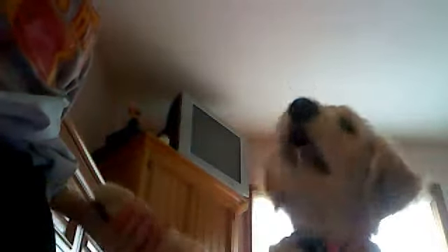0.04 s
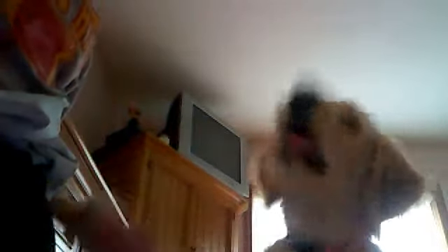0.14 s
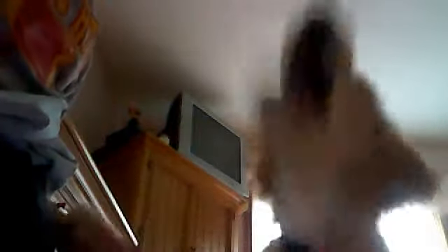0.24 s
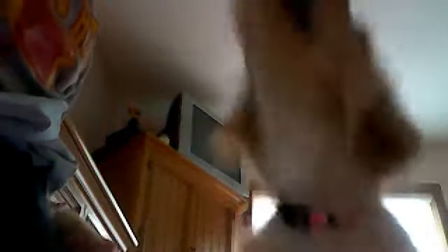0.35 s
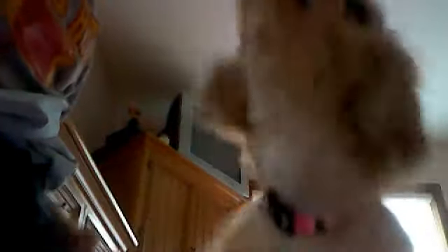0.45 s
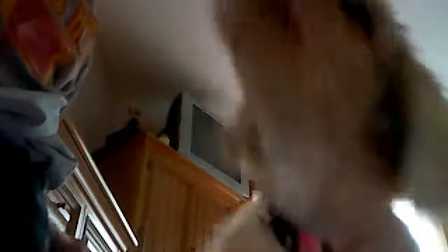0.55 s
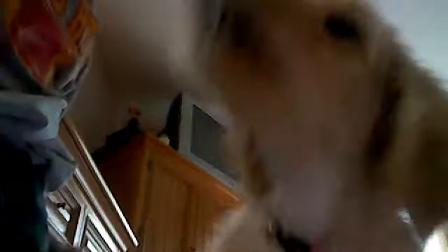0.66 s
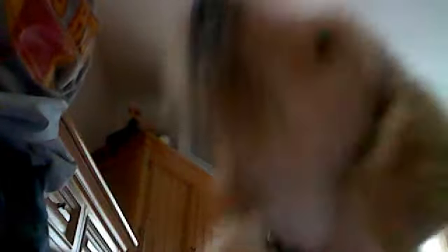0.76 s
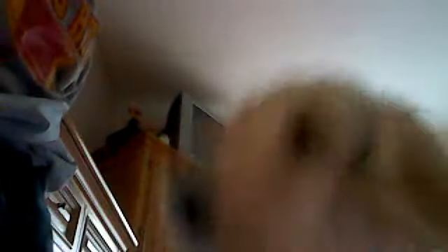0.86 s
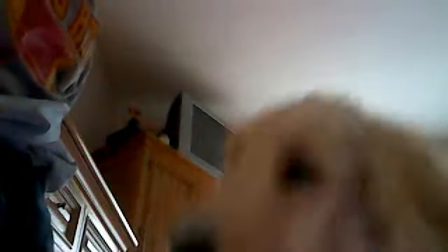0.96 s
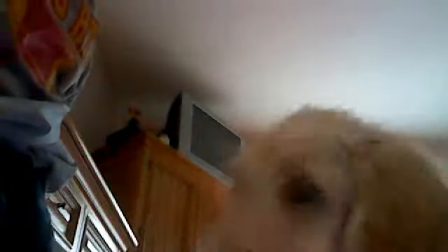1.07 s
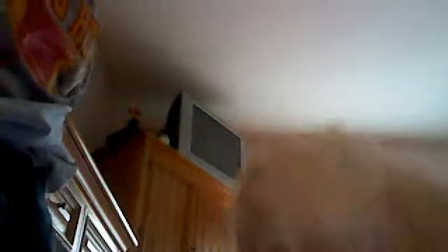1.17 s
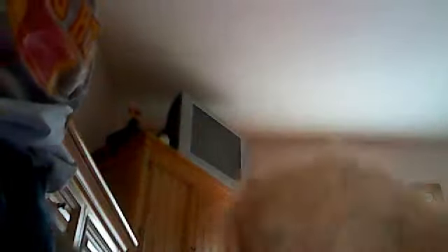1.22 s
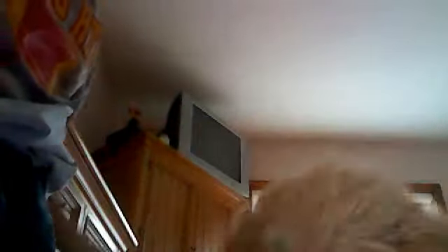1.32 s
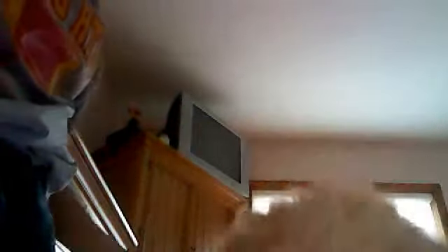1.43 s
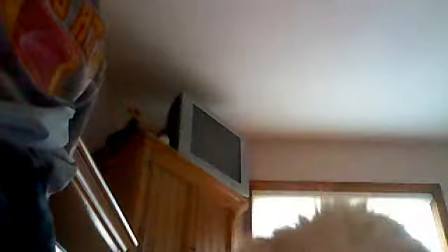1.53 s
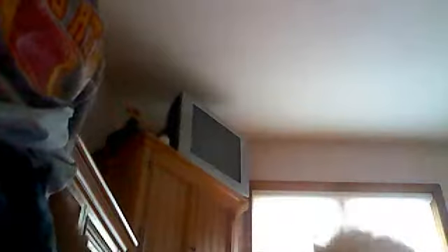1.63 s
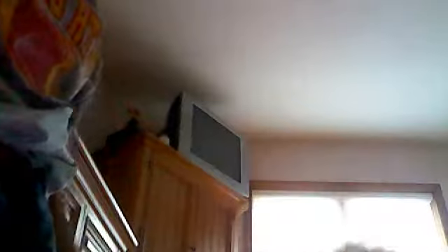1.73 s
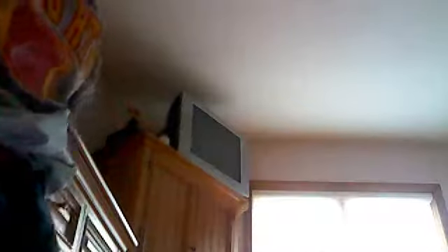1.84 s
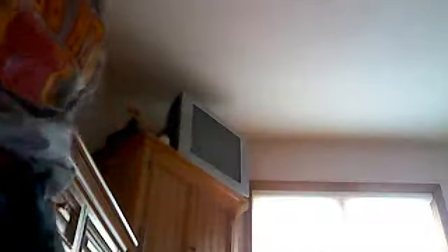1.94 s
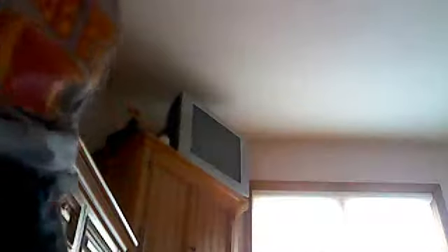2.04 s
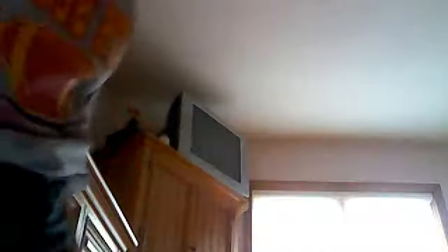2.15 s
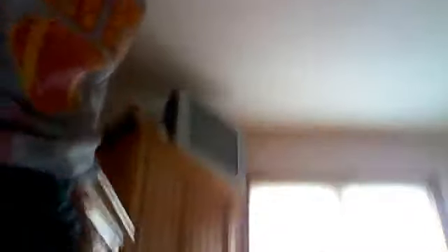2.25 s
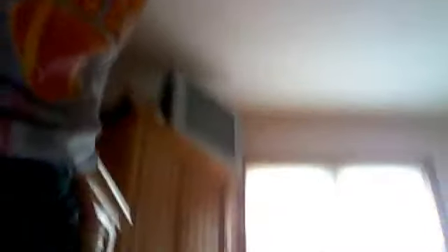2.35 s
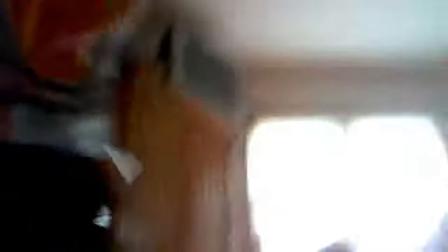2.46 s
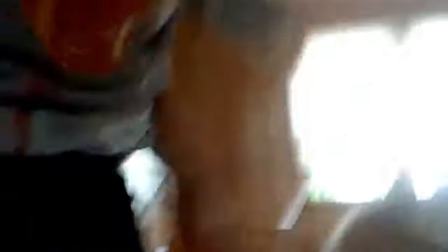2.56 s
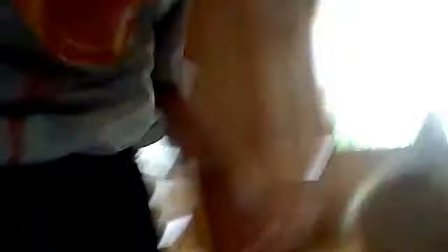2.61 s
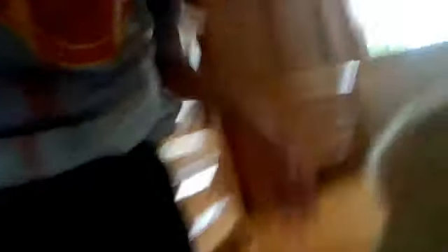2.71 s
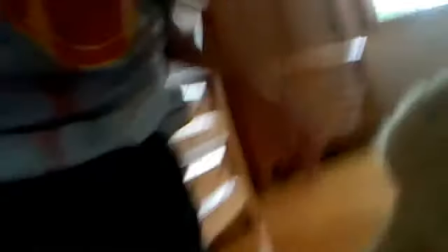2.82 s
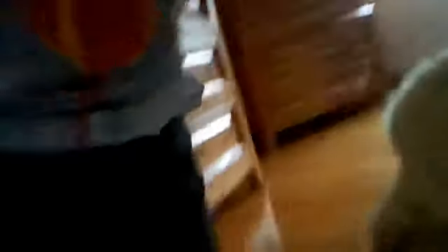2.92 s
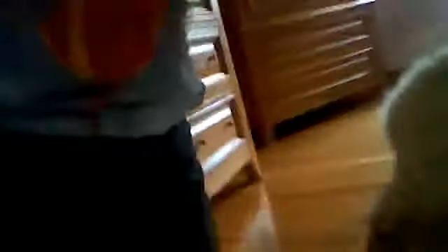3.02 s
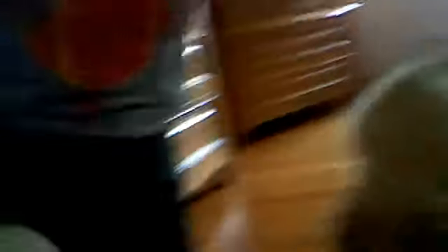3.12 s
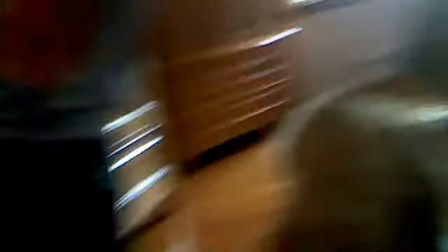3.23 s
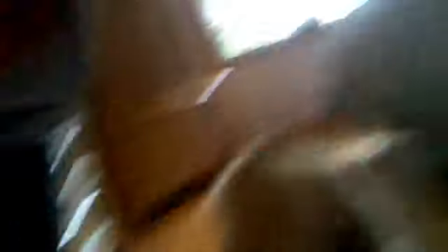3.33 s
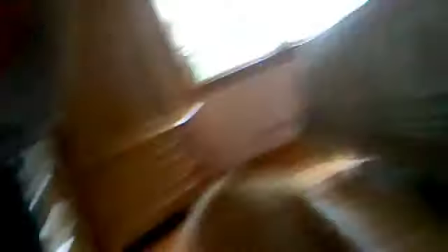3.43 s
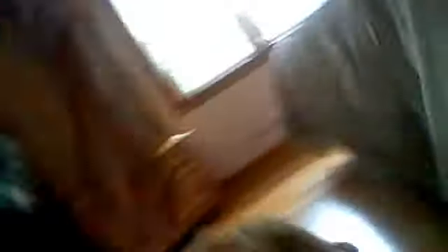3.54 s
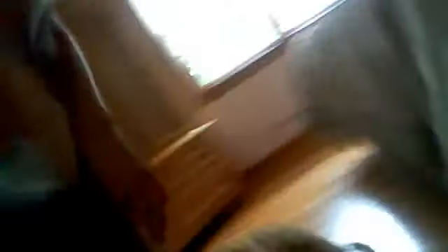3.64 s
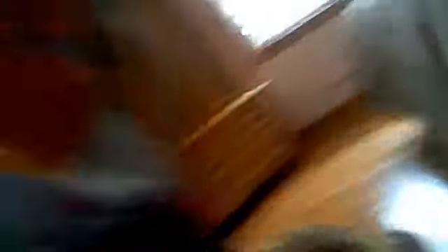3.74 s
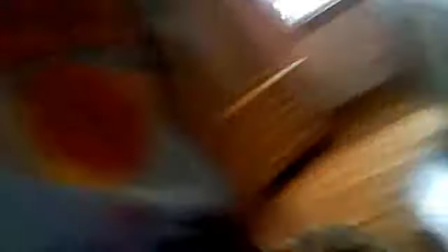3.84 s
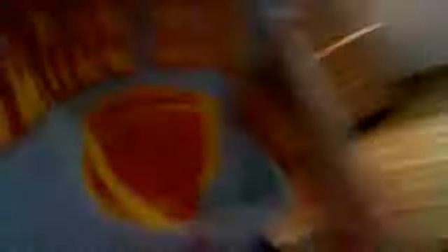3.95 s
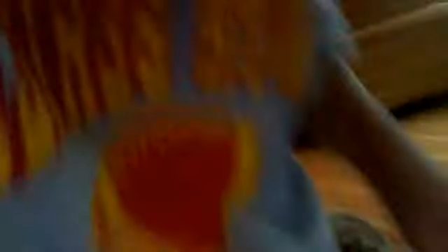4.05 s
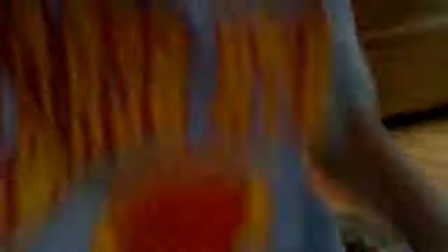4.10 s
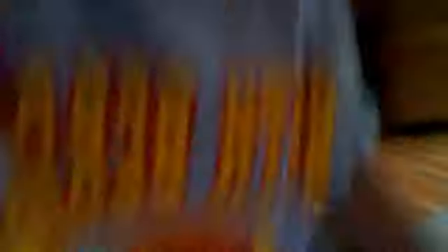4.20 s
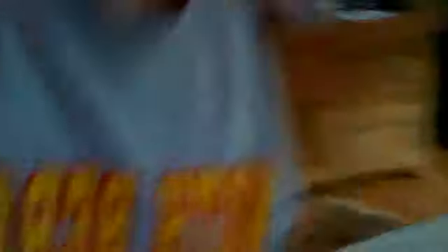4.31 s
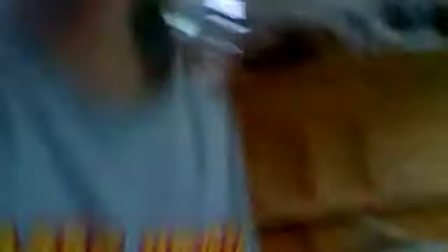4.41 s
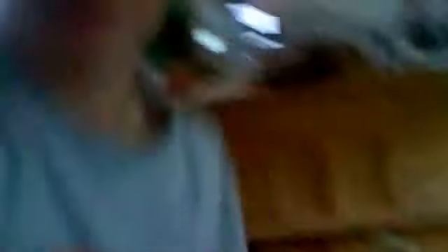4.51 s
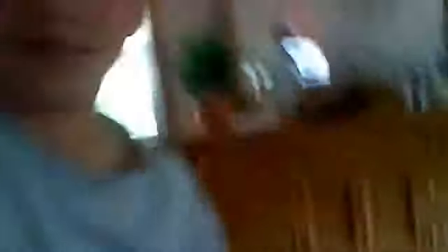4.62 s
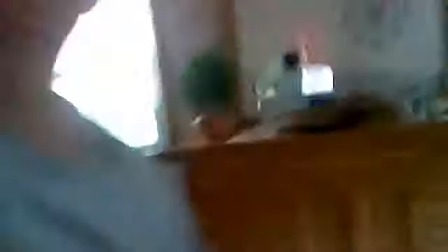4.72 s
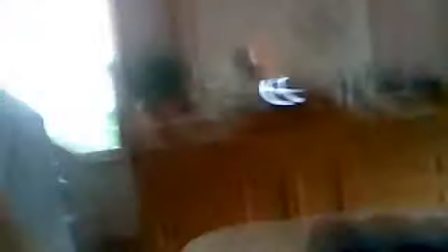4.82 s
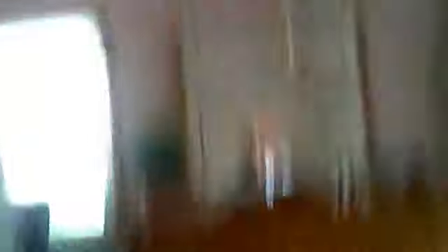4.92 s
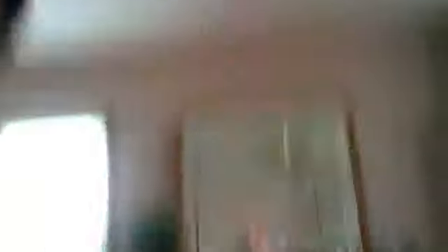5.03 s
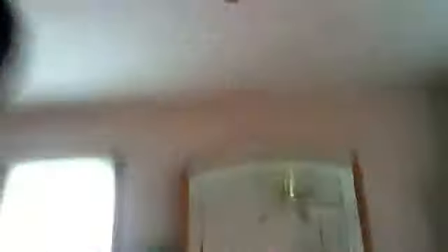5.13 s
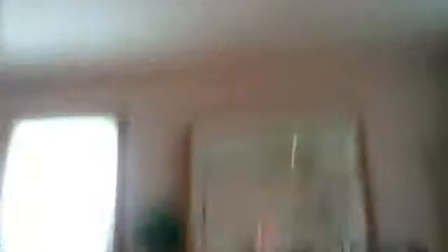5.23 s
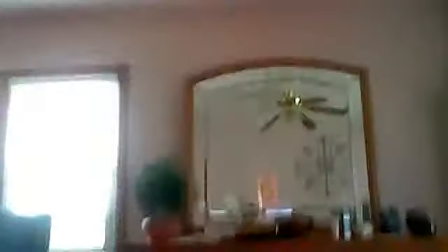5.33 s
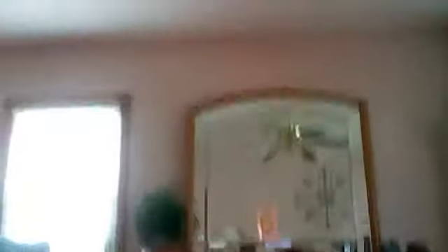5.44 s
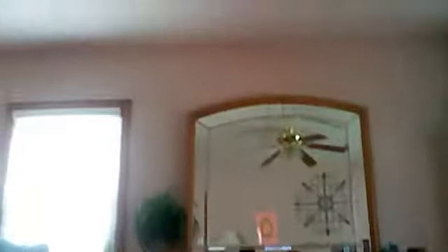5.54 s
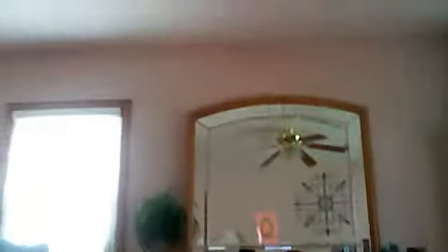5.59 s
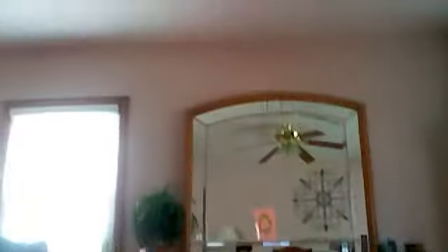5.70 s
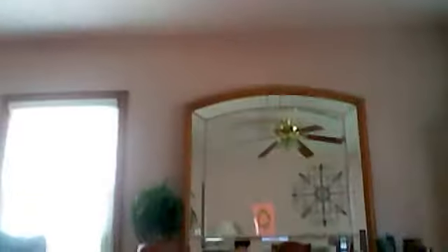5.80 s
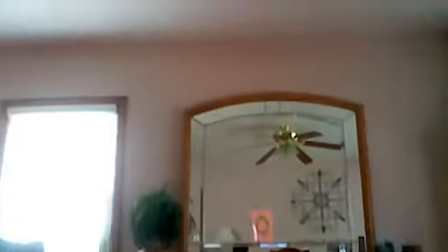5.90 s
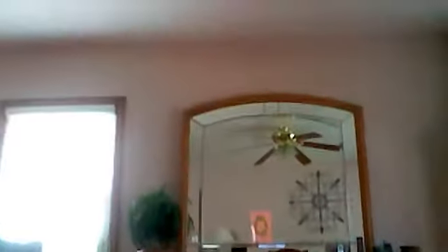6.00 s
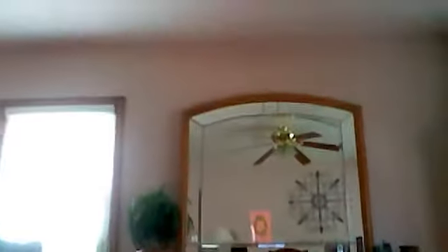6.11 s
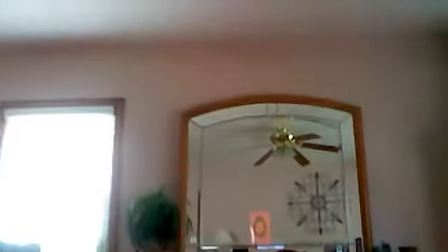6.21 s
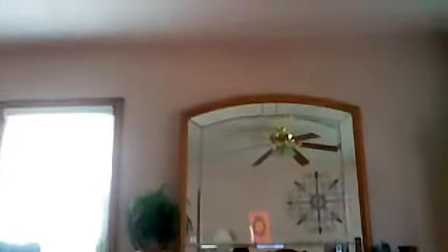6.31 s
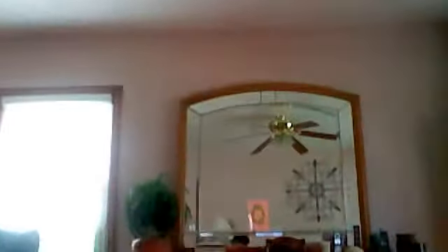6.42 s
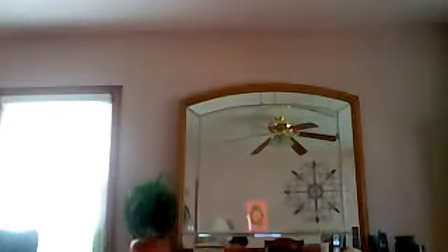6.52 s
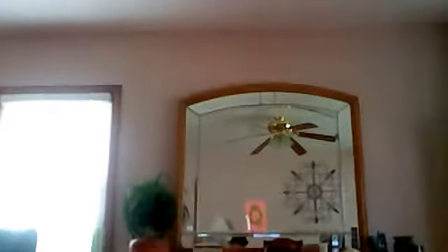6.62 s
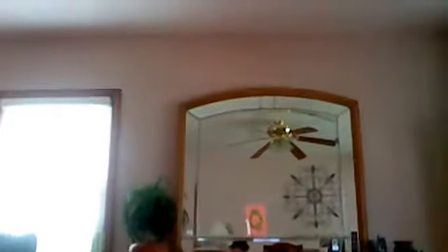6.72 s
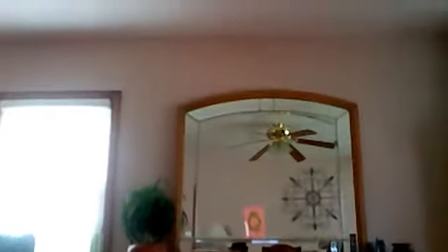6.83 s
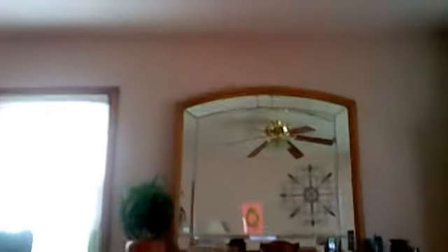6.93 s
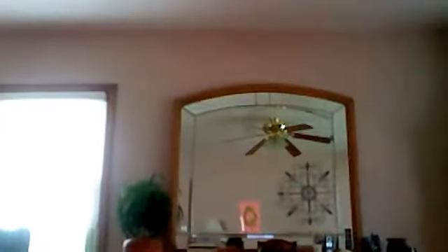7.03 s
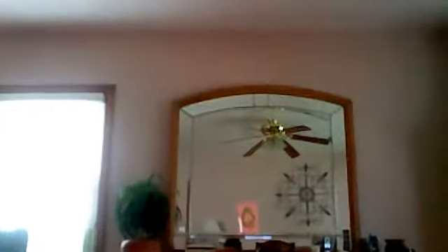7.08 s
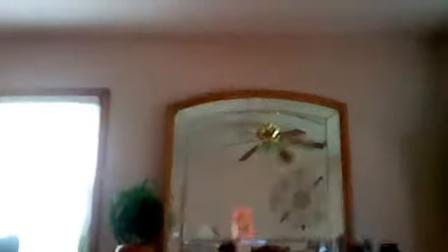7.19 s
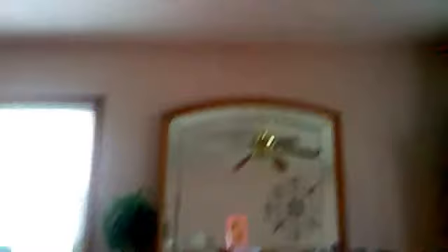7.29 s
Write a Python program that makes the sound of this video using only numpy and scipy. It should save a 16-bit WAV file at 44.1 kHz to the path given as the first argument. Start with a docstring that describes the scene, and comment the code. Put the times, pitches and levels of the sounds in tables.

```python
"""Knocks, taps and rattles of fingers on the plastic case of a small camera carried about a quiet room.
Each knock rings the modes of the case; the grip shoves low thumps and scuffs straight into the
microphone, which overloads on the hardest blows. A puppy whimpers once. Below lie room noise,
a wavering low hum and a faint pulsing whine of the electronics."""
import sys
import numpy as np
from scipy import signal
from scipy.io import wavfile
from scipy.ndimage import uniform_filter1d

SR = 44100
rng = np.random.default_rng(int(sys.argv[2]) if len(sys.argv) > 2 else 0)


def file_out(sig):
    """Save sig as 16-bit WAV at sys.argv[1]."""
    # one column per channel
    cols = np.atleast_2d(sig).T
    # limit, then scale
    lim = np.clip(cols, -1, 1)
    pcm = np.round(lim * 32767).astype(np.int16)
    wavfile.write(sys.argv[1], SR, pcm)


N = 324399


def from_db(db):
    """Gain of a level in dB."""
    return 10 ** (np.asarray(db) / 20)


def rms_one(x):
    """Scaled to rms 1."""
    return x / np.sqrt(np.mean(x ** 2) + 1e-20)


def curves(rows):
    """Each column after t/s, interpolated per sample."""
    t_s, *columns = np.transpose(rows)
    return [np.interp(np.arange(N) / SR, t_s, column) for column in columns]


def band(x, low_hz, high_hz, order=2):
    """Butterworth band-pass."""
    return signal.sosfilt(signal.butter(order, [low_hz, high_hz], "band", fs=SR, output="sos"), x)


def ring(x, hz, t60_s):
    """Resonator: a unit click starts a decaying sine of height 1."""
    r, w = from_db(-60 / (t60_s * SR)), 2 * np.pi * hz / SR
    return signal.lfilter([0, np.sin(w)], [1, -2 * r * np.cos(w), r * r], x + 1e-18)


def grains(per_s, spread_db):
    """Random impulses of uneven size and sign."""
    sizes = from_db(spread_db * np.minimum(rng.exponential(1, N), 4)) * rng.choice([-1, 1], N)
    return sizes * (rng.random(N) < per_s / SR)


def evened(x, window_s):
    """Divided by its running rms."""
    width = int(window_s * SR)
    power = uniform_filter1d(uniform_filter1d(x ** 2, width), width)
    return x / np.sqrt(power + 1e-12)


def struck(times_s, sizes, hz, t60_s, contact_cycles):
    """One mode driven by Hann pulses: longer contact, less splash into other pitches."""
    clicks = np.zeros(N)
    np.add.at(clicks, (times_s * SR).astype(int), sizes)
    touch = np.hanning(int(contact_cycles * SR / hz) + 3)
    gain_at_mode = np.abs(np.sum(touch * np.exp(2j * np.pi * hz / SR * np.arange(len(touch)))))
    return ring(np.convolve(clicks, touch / gain_at_mode)[:N], hz, t60_s)


def damped_sines(rows, rise_cycles):
    """One decaying sine per row: t/s, level/dB, f/Hz, t60/s."""
    out = np.zeros(N)
    for start_s, level_db, hz, t60_s in rows:
        start = int(start_s * SR)
        t = np.arange(min(int(t60_s * SR), N - start)) / SR
        rise = np.minimum(t * hz / rise_cycles, 1) ** 2
        envelope = rise * from_db(level_db - 60 * t / t60_s)
        out[start:start + len(t)] += envelope * np.sin(2 * np.pi * hz * t)
    return out


# Room noise spectrum: f/Hz, relative density/dB
ROOM_SPECTRUM = [(18, -29), (30, -4), (101, -3), (146, -4), (432, -7.5), (611, -15), (907, -15.5),
                 (4990, -33), (7980, -33), (11000, -51), (14300, -83.5), (22000, -120)]


def room_noise(rms_db=-49):
    """Steady noise in half-octave bands."""
    hz, density_db = np.transpose(ROOM_SPECTRUM)
    white = rng.standard_normal((2, N))
    edges_hz = 22 * 2 ** np.arange(0, 9.6, .5)
    out = np.zeros(N)
    for k, (low_hz, high_hz) in enumerate(zip(edges_hz, edges_hz[1:])):
        centre_db = np.interp(np.log(low_hz * high_hz) / 2, np.log(hz), density_db)
        out += from_db(centre_db) * band(white[k % 2], low_hz, high_hz)
    return from_db(rms_db) * rms_one(out)


def hum(hz=95.04, width_hz=0.95, level_db=-41.5, lift_s=2.6, lift_db=-5.5):
    """Wavering narrow-band hum, weaker once the camera is off the table."""
    noise = band(rng.standard_normal(N), hz - width_hz / 2, hz + width_hz / 2, order=1)
    lifted = np.arange(N) > lift_s * SR
    return from_db(level_db + lift_db * lifted) * evened(noise, 0.45)


def whine(tone_hz=8000, pulse_hz=17.075, tone_db=-69.5, hiss_db=-71):
    """Electronics: a thin tone and hiss, on for half of each cycle."""
    t = np.arange(N) / SR
    on = np.cos(2 * np.pi * (pulse_hz * t + .22)) > 0
    gate = uniform_filter1d(on.astype(float), size=90)
    tone = np.sin(2 * np.pi * tone_hz * t)
    hiss = rms_one(band(rng.standard_normal(N), 7100, 8300, order=4))
    return gate * (from_db(tone_db) * tone + from_db(hiss_db) * hiss)


# Puppy's voice: t/s, f/Hz, level/dB
WHIMPER_CONTOUR = [(.13, 1076, -81), (.155, 1162, -39.5), (.2, 1184, -42.5), (.25, 1210, -59),
                   (.28, 1230, -73)]


def whimper(gate_db=-69):
    """A puppy's faint, breathy, nearly pure rising tone."""
    hz, level_db = curves(WHIMPER_CONTOUR)
    flutter = 1 + 0.53 * rms_one(band(rng.standard_normal(N), 19, 150))
    tone = np.sin(2 * np.pi * np.cumsum(hz) / SR)
    return from_db(level_db) * flutter * tone * (level_db > gate_db)


# Broad noise bursts (scuffs, short hissy tails after hard knocks): t/s, length/s, level/dB, centre f/Hz
BROAD_BURSTS = [(0.188, 0.071, -33, 346), (0.372, 0.12, -53, 1680), (0.494, 0.049, -36, 337),
                (0.721, 0.074, -49.5, 1100), (1.05, 0.073, -50, 1960), (1.325, 0.078, -53, 1390),
                (2.258, 0.071, -19, 1300), (2.34, 0.15, -20.5, 2000), (2.456, 0.06, -29.5, 2200),
                (2.626, 0.09, -25.5, 1850), (3.019, .10, -40.5, 570), (2.901, 0.056, -33, 1380),
                (3.254, 0.056, -33, 1450), (4.14, 0.15, -35.5, 910), (4.389, 0.086, -32, 1500),
                (4.742, 0.055, -34.5, 1510), (4.787, 0.14, -25, 785), (5.107, 0.099, -29, 2160),
                (5.58, 0.095, -39.5, 1000), (6.176, 0.063, -36.5, 1300), (7.22, 0.2, -51, 1500)]
# Rubs in the hollow of the hand: t/s, length/s, level/dB
HOLLOW_RUBS = [(1.603, 0.11, -48), (1.871, 0.17, -45.5), (2.237, 0.058, -37), (3.188, 0.079, -32.5),
               (3.619, 0.098, -32), (3.898, 0.18, -36.5), (6.492, 0.11, -45.5)]


def scuffs_and_tails(lowpass_hz=1310, broad_octaves=3.57, hollow_hz=860, hollow_octaves=0.29):
    """Band-limited bursts of dulled, grainy noise; each starts fast, weakens a little and fades out."""
    pole = np.exp(-2 * np.pi * lowpass_hz / SR)
    grit = signal.lfilter([1], [1, -pole], grains(per_s=4800, spread_db=5.4))
    bursts = [(*row, broad_octaves) for row in BROAD_BURSTS]
    bursts += [(*row, hollow_hz, hollow_octaves) for row in HOLLOW_RUBS]
    out = np.zeros(N)
    for start_s, length_s, level_db, hz, octaves in bursts:
        start = int(start_s * SR)
        t = np.arange(int((length_s + .03) * SR)) / SR
        attack = np.minimum(t / 0.0043, 1)
        release = np.clip((length_s + 0.019 - t) / 0.016, 0, 1)
        envelope = attack * from_db(level_db - 7 * t / length_s) * release
        edge_ratio = 2 ** (octaves / 2)
        crunch = band(grit[start:start + len(t)], hz / edge_ratio, hz * edge_ratio, order=3)
        out[start:start + len(t)] += envelope[:len(crunch)] * rms_one(crunch)
    return out


# Restlessness of the hand: t/s, shove level/dB, slide level/dB
HAND_MOTION = [(0.0, -40.5, -55), (0.22, -37, -52), (2.19, -37.5, -50.5), (2.5, -43, -29.5),
               (2.85, -37, -40), (3.26, -22.5, -41.5), (3.6, -33.5, -41), (4.73, -21.5, -42.5),
               (5.0, -25.5, -34), (5.8, -38.5, -55), (7.03, -36.5, -63.5), (7.36, -32, -49)]


def slide(dull_gain_db=-2, bright_gain_db=-16):
    """The sliding hand sends dense slips through resonances of the case."""
    _, slide_db = curves(HAND_MOTION)
    coarse = grains(per_s=900, spread_db=6.5)
    fine = grains(per_s=3000, spread_db=3.3)
    dull = band(coarse, 290, 950) + 0.0038 * ring(coarse, 867, 0.077)
    bright = (band(fine, 1200, 2840)
              + from_db(-21.5) * band(fine, 2100, 6000)
              + from_db(-22.5) * band(fine, 6000, 9500))
    friction = from_db(dull_gain_db) * rms_one(dull) + from_db(bright_gain_db) * rms_one(bright)
    return from_db(slide_db) * friction


# Shoves of the whole camera: t/s, level/dB, f/Hz, t60 of the shaking after/s
SHOVES = [(0.195, -12, 103, 0.41), (0.498, -16, 115, 0.36), (0.608, -29, 93, .3), (1.091, -11, 93, 0.16),
          (1.766, -26, 105, 0.6), (2.264, -0.5, 148.6, 0.91), (2.373, -11.5, 67.6, 0.46),
          (2.441, -14, 107.8, .4), (2.578, -6, 119, .4), (2.627, -0.5, 137, 0.42), (3.054, -9, 49.3, 0.6),
          (3.367, -21.5, 56.5, 0.98), (3.688, -16, 51.1, 1.04), (4.138, -11.5, 145.5, 0.52),
          (4.179, -9.5, 50.5, 0.19), (4.508, -31, 78.1, .5), (4.58, -10.5, 51.4, 0.22),
          (4.638, -14, 70, 0.19), (4.682, -7, 105.5, 0.23), (4.8, -0.5, 140.4, 0.76),
          (5.375, -13, 129, 0.19), (5.417, -14, 97, 0.32), (5.904, -27, 94, .3), (7.257, -22.5, 104, 0.33)]


def thumps(t60_s=0.11, gain_db=1.5):
    """The whole body swings a few cycles after a shove."""
    swings = [(t_s, level_db + gain_db, hz, t60_s) for t_s, level_db, hz, _ in SHOVES]
    return damped_sines(swings, rise_cycles=0.52)


def grip(rest_db=-44.5, sway_gain_db=-9.5, shake_gain_db=-7, shake_rise_s=0.01):
    """Slow diaphragm sway and case rumble, fed by the restless hand and the shaking after each thump."""
    t = np.arange(N) / SR
    hand_db, _ = curves(HAND_MOTION)
    sway_db = rest_db + 1.33 * (hand_db - rest_db) + sway_gain_db  # swings wider than the hand
    sway_power = from_db(sway_db) ** 2
    rumble_power = from_db(hand_db - 7.5) ** 2
    for start_s, level_db, hz, t60_s in SHOVES:
        age_s = np.maximum(t - start_s, 0)
        rise = np.minimum(age_s / shake_rise_s, 1)
        shake_power = rise * from_db(level_db + shake_gain_db - 60 * age_s / t60_s) ** 2
        rumble_power += shake_power
        sway_power += shake_power * from_db(-3 * np.log2(hz / 60)) ** 2  # -3 dB/octave
    sway = evened(band(grains(per_s=90, spread_db=3.7), 12, 60.6), 0.05)
    jolts = grains(per_s=150, spread_db=2.2)
    rumble = evened(band(jolts, 68, 200) + 0.0044 * ring(jolts, 123.3, 0.061), 0.084)
    return np.sqrt(sway_power) * sway + from_db(-2) * np.sqrt(rumble_power) * rumble


# Soft finger taps: t/s, level/dB, f/Hz
FINGER_TAPS = [(0.199, -17.5, 271), (0.409, -34.5, 1080), (0.996, -35, 726), (1.627, -30, 950),
               (1.933, -30.5, 870), (1.963, -24.5, 913), (2.04, -27, 854), (2.094, -27.5, 850),
               (2.117, -20.5, 630), (2.849, -28, 990), (3.484, -22.5, 930), (3.606, -9, 843),
               (3.636, -20, 750), (3.718, -16, 301), (3.876, -10, 350), (3.935, -17.5, 463),
               (3.985, -23.5, 776), (4.315, -18, 425), (4.69, -11, 344), (4.753, -16, 332),
               (5.213, -22, 1200)]


def taps(t60_s=.035, nail_gain_db=-7):
    """A nail click and two close, hollow modes; the hand damps the main mode of low taps."""
    main = [(t_s, db + 3, hz, t60_s * np.clip(hz / 800, .6, 1)) for t_s, db, hz in FINGER_TAPS]
    upper = [(t_s, db - 12.5, hz * 1.126, 1.2 * t60_s) for t_s, db, hz in FINGER_TAPS]
    times_s, level_db, _ = np.transpose(FINGER_TAPS)
    nail = struck(times_s, from_db(level_db + nail_gain_db), hz=1600, t60_s=0.0028, contact_cycles=.4)
    return damped_sines(main + upper, rise_cycles=0.69) + nail


# Modes of the plastic case: f/Hz, level/dB, t60/s
CASE_MODES = [(373.7, 4.5, 0.032), (472, 4, 0.031), (778, 2.5, 0.012), (907, 3.5, 0.02), (1547, -4, 0.022),
              (1797, 5, 0.0093), (2353, -2, 0.015), (2822, 3, 0.0059), (3897, 7, 0.012), (4547, 8, 0.0064),
              (5330, 5.5, 0.0039), (7230, -3, 0.0089), (8960, -18, 0.022)]
# Part carrying each mode: 0 clack, 1 body, 2 tick
MODE_PARTS = [1, 1, 1, 1, 0, 0, 0, 0, 2, 2, 2, 2, 2]
# Hard knocks: t/s, clack level/dB, body level re clack/dB
CASE_KNOCKS = [(0.1048, -43, -14), (0.1965, -26, 0), (0.5049, -25.5, 5), (0.7366, -44, 7), (0.789, -48, -5),
               (0.8802, -46.5, 8), (1.3352, -33.5, -5), (1.3773, -34, -4), (1.6368, -32, -10),
               (2.2691, -13, 1.5), (2.2802, -16, -17), (2.2915, -20, 7), (2.3234, -7, -4.5),
               (2.357, -7.5, -11.5), (2.374, -5, -13), (2.388, -9, -12), (2.4217, -4.5, -28),
               (2.4257, -4.5, -16.5), (2.4387, -7, -7), (2.4508, -6.5, -3.5), (2.4574, -5.5, -14.5),
               (2.5334, -28, 5), (2.5745, -27.5, 6.5), (2.6382, -7.5, -20), (2.6474, -8.5, -3.5),
               (2.6602, -11, -3.5), (2.6705, -2.5, -3.5), (2.7048, -17.5, 0.5), (2.8942, -5, -8.5),
               (3.041, -35, -20), (3.0704, -31.5, 7), (3.2312, 1, -11.5), (3.2432, -14.5, 2.5),
               (3.269, -24, 3), (3.432, -33.5, -10), (3.7388, -24.5, -7), (3.7663, -4.5, -8),
               (4.0159, -35.5, 8), (4.1047, -24.5, -14), (4.1408, -29.5, 4.5), (4.2112, -5, -12),
               (4.3997, 2, -10.5), (4.4253, -21, -2), (4.4574, -6.5, -12), (4.5684, -5, -12.5),
               (4.6432, -25, 4), (4.7624, -15, -3), (4.7969, -24, -8), (4.805, -5.5, -14),
               (4.8138, -10.5, 0.5), (4.8554, -1, -10.5), (4.8708, -11.5, -2), (4.881, -15, -12),
               (4.8993, -17, -8), (4.975, -23, -11), (5.0003, -15.5, 1), (5.034, 0, -12.5),
               (5.1118, -3, -14), (5.136, -13.5, -3), (5.1494, -8, -21), (5.1661, -10.5, -7),
               (5.2107, -23, 0.5), (5.3214, -8, -7), (5.428, -24, -4.5), (5.4471, -16, -3.5),
               (5.5196, -7, -15), (5.5669, -7.5, -12.5), (5.6128, -12.5, -10), (5.679, -38, -4),
               (5.7967, -38, -7), (6.1677, -7, -9), (6.2005, -30, -3), (6.3534, -32, -12),
               (6.5821, -39, -4), (6.999, -32, -7), (7.2542, -34.5, 6)]


def knocks(tail_by_part_db=(-24.5, -15, -16.5), tail_t60_s=0.12):
    """Touch and rebound ring the case modes; a short noisy tail at the same pitches dies away after."""
    times_s, clack_db, body_db = np.transpose(CASE_KNOCKS)
    tick_db = clack_db - 21.5 - 0.6326 * body_db  # fleshier blow: more body, less tick
    part_db = [clack_db, clack_db + body_db, tick_db]
    draws = rng.random((len(times_s), 4, len(CASE_MODES)))
    grit = grains(per_s=5000, spread_db=2)
    power_decay = from_db(-60 / (tail_t60_s * SR)) ** 2
    out = np.zeros(N)
    for k, ((hz, mode_db, t60_s), part) in enumerate(zip(CASE_MODES, MODE_PARTS)):
        size_draw, tail_draw, sign_draw, lag_draw = draws[:, :, k].T
        blow_db = part_db[part] + mode_db
        touch = from_db(blow_db - 6.5 + 11.9 * (size_draw - .5))
        rebound = .9 * touch * np.sign(sign_draw - .5)
        rebound_s = times_s + .0006 + .0014 * lag_draw
        out += struck(np.r_[times_s, rebound_s], np.r_[touch, rebound], hz, t60_s, contact_cycles=0.87)

        tail_db = blow_db + tail_by_part_db[part] + 5.2 * (tail_draw - 1.5)
        onsets = np.zeros(N)
        np.add.at(onsets, (times_s * SR).astype(int), from_db(tail_db) ** 2)
        tail_power = signal.lfilter([1], [1, -power_decay], onsets + 1e-18)
        out += np.sqrt(tail_power) * rms_one(band(grit, hz / 1.12, hz * 1.12))
    return band(out, 200, 14000)


def scene():
    """Handling, puppy and background at one microphone."""
    handling = knocks() + taps() + thumps() + grip() + slide() + scuffs_and_tails()
    return (handling + whimper() + room_noise() + hum() + whine())[None]


def record(dry, overload=.68, converter_hz=10700, cutoff_hz=15900):
    """Loud peaks flatten, little passes above the converter's edge, the top is cut."""
    flattened = dry / (1 + np.abs(dry / overload) ** 4) ** (1 / 4)
    narrowed = signal.sosfilt(signal.ellip(5, .3, 10, converter_hz, fs=SR, output="sos"), flattened)
    return signal.sosfilt(signal.cheby2(12, 70, cutoff_hz, fs=SR, output="sos"), narrowed)


dry = scene()
out = record(dry)
file_out(out)
```